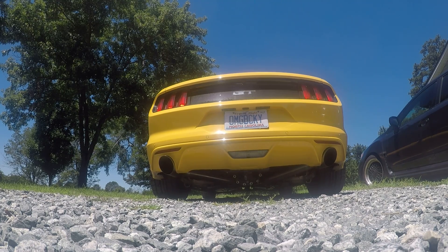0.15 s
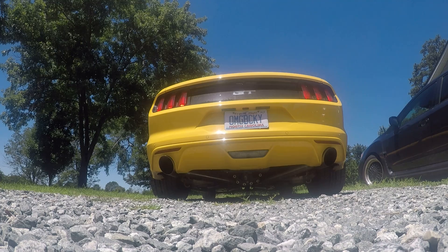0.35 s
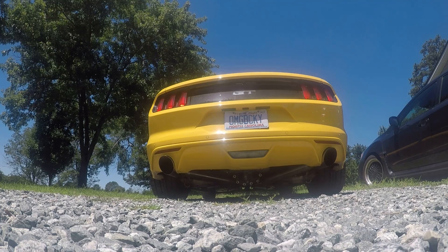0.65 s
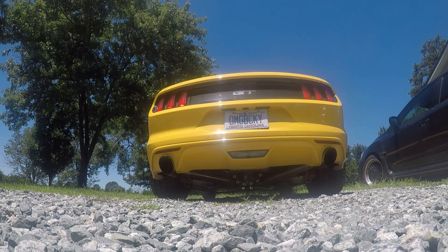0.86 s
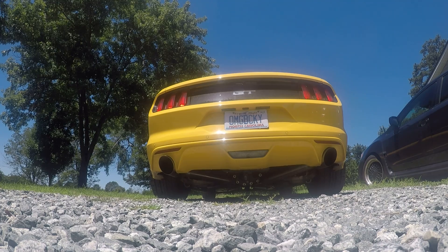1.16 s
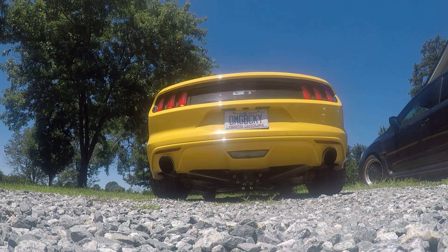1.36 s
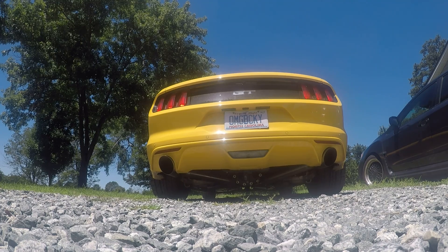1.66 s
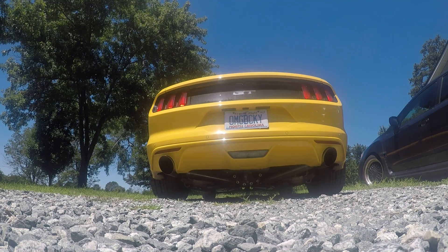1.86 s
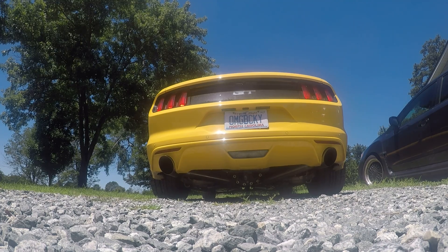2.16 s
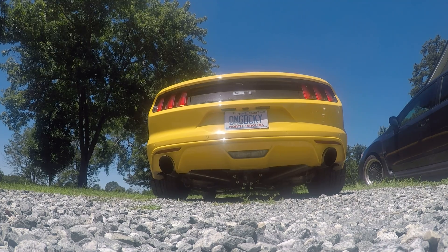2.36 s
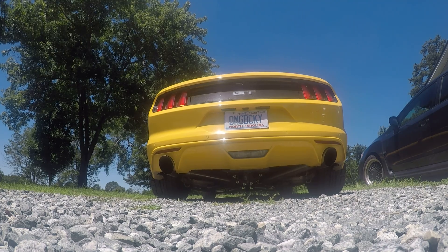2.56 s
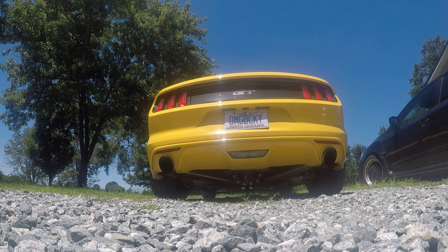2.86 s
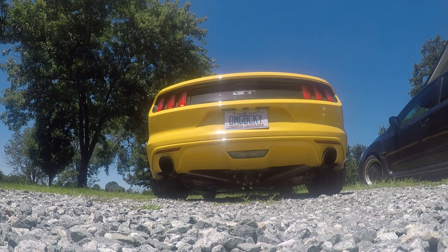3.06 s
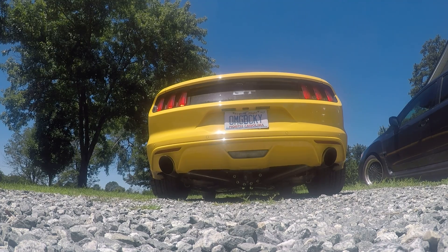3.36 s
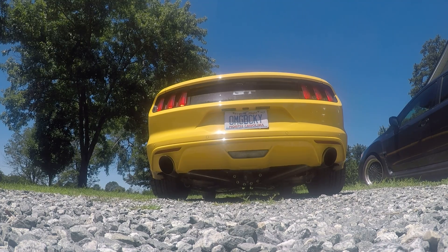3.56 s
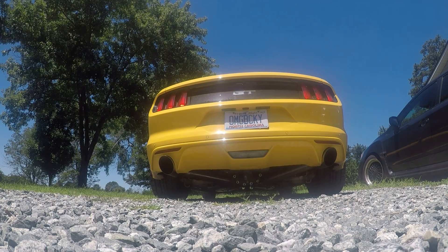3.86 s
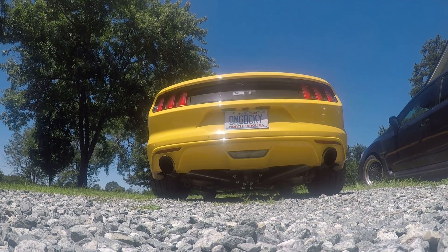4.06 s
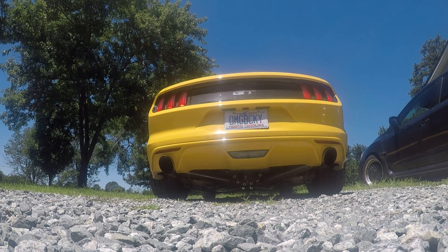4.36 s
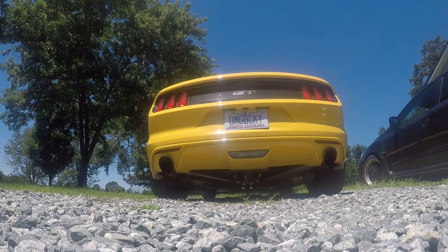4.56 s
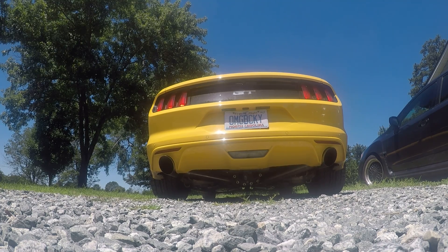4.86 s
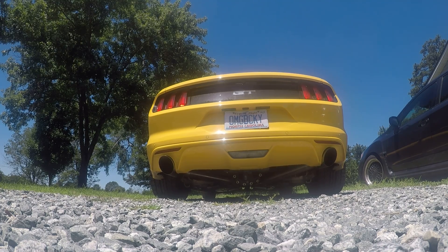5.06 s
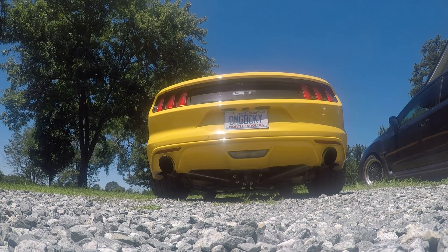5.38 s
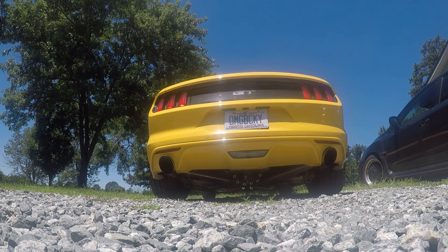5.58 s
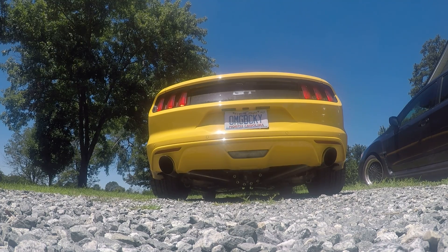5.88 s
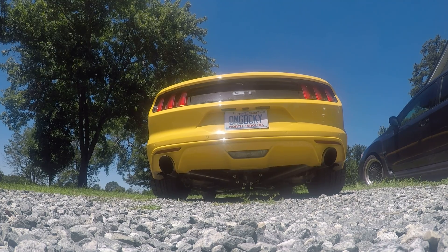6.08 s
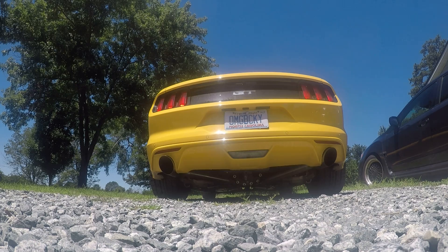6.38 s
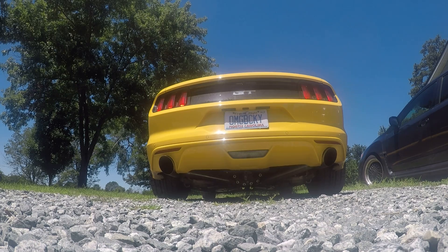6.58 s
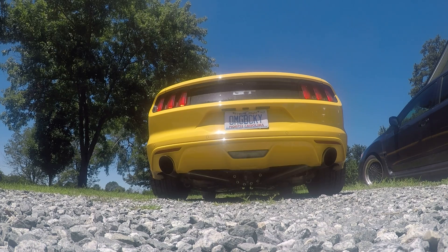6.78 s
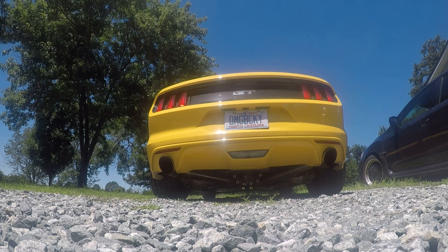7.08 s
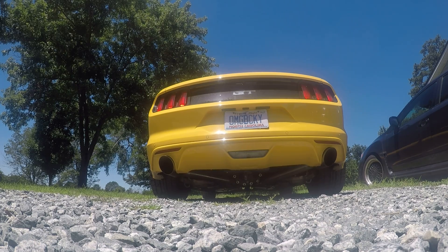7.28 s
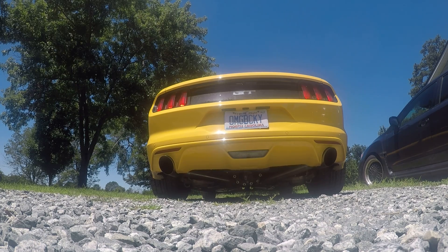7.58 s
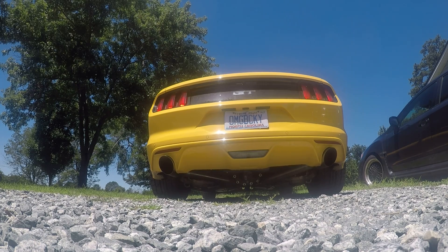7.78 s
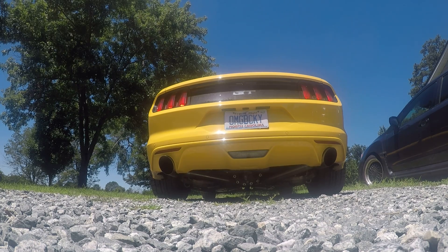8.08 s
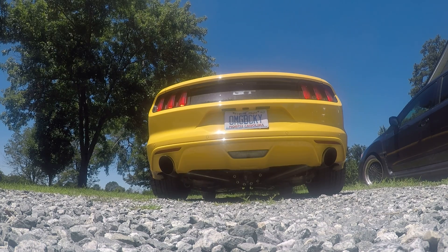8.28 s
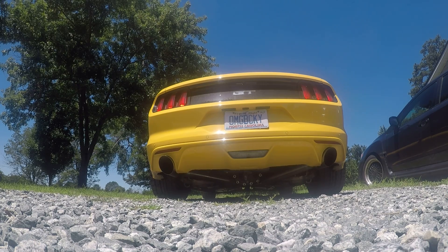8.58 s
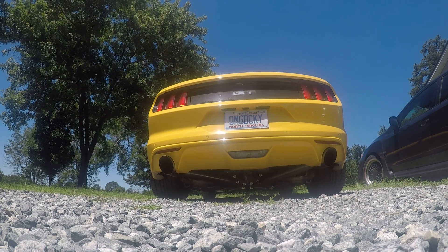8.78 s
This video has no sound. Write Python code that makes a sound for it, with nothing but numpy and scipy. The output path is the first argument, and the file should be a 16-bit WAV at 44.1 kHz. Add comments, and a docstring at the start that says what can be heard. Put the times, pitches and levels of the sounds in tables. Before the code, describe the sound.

Loud, dry exhaust idle of a big eight-cylinder engine, outdoors, with the microphones near the ground behind the tailpipes. A fast, uneven cold idle with raspy crackle swells slightly for a second, slides down a little in speed by about 1.7 seconds, and becomes a deep, denser throb. Bassy pulses, pipe rasp and small bursts of hiss continue steadily, over barely audible wind rumble.

```python
"""A V8 idles through two open tailpipes, heard from behind: after a second its fast cold idle sinks and settles.
Each engine cycle repeats an uneven lope of thumps, pressure waves that ring and reflect inside the pipes.
Each wave front cracks as it leaves the pipe and trails a puff of jet hiss, noise opened by the gas flow.
Rough flow rasps inside the pipes, and faint low wind flutters behind; all reach two microphone ports."""
import sys
import numpy as np
from scipy import signal
from scipy.fft import rfft, irfft, next_fast_len
from scipy.io import wavfile

SR = 44100
rng = np.random.default_rng(int(sys.argv[2]) if len(sys.argv) > 2 else 0)


def to_wav(sig):
    """Store sig (one row per channel, or 1-D mono) as 16-bit WAV at the path in sys.argv[1].

    Samples outside -1..1 are clipped; the rate is SR.
    """
    pcm = np.clip(np.atleast_2d(sig), -1, 1) * 32767
    pcm = np.round(pcm).astype(np.int16)
    wavfile.write(sys.argv[1], SR, pcm.T)  # frames by channels


N = 393813

# Source levels over time, before each source's own offset: t/s, thump level/dB, crack level/dB, wind level/dB
SOURCE_LEVELS = [(0.0, -17, -27, -54), (1.1, -16.5, -27, -55), (1.3, -16, -27.5, -52),
                 (1.45, -16, -30.5, -59), (1.7, -14.5, -30.5, -59), (2.0, -13, -31.5, -43),
                 (2.7, -11.5, -31, -66), (4.5, -11, -32, -44), (8.93, -11, -34, -49)]
# Transition of the cam timing as the speed sinks: t/s, share of the settled idle/1
IDLE_SETTLING = [(1.05, 0.02), (1.4, .4), (1.7, 0.98)]


def gain_of(db):
    """Level to amplitude: 20 dB is a factor of ten in pressure."""
    return 10 ** (np.asarray(db) / 20)


def evened(x):
    """Normalization to unit RMS, so that a level alone sets the loudness."""
    return x / np.sqrt(np.mean(x ** 2) + 1e-20)


def read(points, hz):
    """Interpolation of a spectrum on a logarithmic frequency axis."""
    f, value = np.transpose(points)
    return np.interp(np.log(hz + 1), np.log(f + 1), value)


def curve(rows, column=1):
    """Linear interpolation of one table column at every sample."""
    return np.interp(np.arange(N) / SR, [r[0] for r in rows], [r[column] for r in rows])


def filtered(x, response):
    """Linear filtering: the spectrum is multiplied by a function of frequency."""
    size = next_fast_len(N)
    spectrum = rfft(x, size) * response(np.fft.rfftfreq(size, 1 / SR))
    return irfft(spectrum, size)[..., :N]


def causal(points, size=8192):
    """Minimum phase: folding the cepstrum gives the earliest impulse response with this spectrum."""
    log_gain = read(points, np.fft.rfftfreq(size, 1 / SR)) * np.log(10) / 20
    cepstrum = irfft(log_gain)
    cepstrum[1:size // 2] *= 2
    cepstrum[size // 2 + 1:] = 0
    return irfft(np.exp(rfft(cepstrum)))[:size // 2]


def settled_share():
    """Crossfade weight of the settled idle, from 0 to 1."""
    return np.clip(curve(IDLE_SETTLING), 0, 1)


def blended(fast, settled):
    """Linear crossfade from the fast idle to the settled idle at equal RMS."""
    share = settled_share()
    return (1 - share) * evened(fast) + share * evened(settled)


def wind():
    """Low-frequency turbulence: band-limited noise, mostly coherent between the ports, raised by gusts."""
    # Gusts as Gaussian rises: t/s, rise of the wind level/dB, length/s
    gust_rows = [(.17, 11, 0.13), (.42, 7, .07), (1.02, 18, 0.12)]
    air = rng.standard_normal((N, 2)).T
    partly_shared = air + 2.2 * air[0]

    def flutter_band(hz):
        """Second-order rise about 14 Hz and steep fall above 55 Hz."""
        return (hz / 14) ** 2 / (1 + (hz / 14) ** 2) / (1 + (hz / 55) ** 6)

    low = filtered(partly_shared, flutter_band)
    t = np.arange(N) / SR
    gusts_db = sum(db * np.exp(-((t - s) / length) ** 2) for s, db, length in gust_rows)
    return gain_of(curve(SOURCE_LEVELS, column=3) + gusts_db) * evened(low)


def rasp(flow):
    """Turbulent pipe flow: noise modulated by the square root of the flow, so it throbs more gently."""
    # Spectrum of the rasp: f/Hz, relative level/dB per Hz
    rasp_colour = [(40, -60), (90, -29), (300, 4.5), (520, -1.5), (760, 2), (1100, -9), (1450, -5.5),
                   (1800, -46), (3000, -50)]
    noise = rng.standard_normal((N, 2)).T
    throbbing = flow ** .5 * (noise + 1.4 * noise[0])
    coloured = filtered(throbbing, lambda hz: gain_of(read(rasp_colour, hz)))
    return gain_of(curve(SOURCE_LEVELS, column=1) - 15.5) * evened(coloured)


def waves(column):
    """Energy normalization: places and levels of all waves, each idle's cycle scaled to the same energy."""
    # One row per cylinder, fast idle, then settled idle:
    # its blow, then a second, mostly weaker wave close to it, usually after it.
    # Columns: blow place/firings (cycle of 8), thump level/dB, crack level/dB,
    # second place/firings, thump level/dB, crack level/dB; levels before the energy scaling
    cylinder_rows = [
        [(-0.01, -4.9, -20.0, 0.12, -18.9, -19.0), (1.08, -1.6, -13.0, 1.3, -18.5, -21.0),
         (2.01, -13.4, -16.0, 2.26, -29.5, -29.0), (2.93, -11.1, -21.0, 3.4, -17.9, -26.0),
         (3.99, -8.3, -19.0, 4.14, -13.5, -14.0), (4.96, -3.7, -16.0, 5.16, -12.1, -15.0),
         (6.03, -4.9, -11.0, 6.59, -15.6, -21.0), (7.02, -3.8, -12.0, 7.69, -11.5, -26.0)],
        [(0.12, -5.3, -27.0, 0.32, -10.1, -33.0), (1.09, -1.1, -26.0, 1.32, -6.7, -27.0),
         (2.02, -5.9, -22.0, 2.44, -8.9, -27.0), (3.02, -1.0, -21.0, 3.4, -4.4, -30.0),
         (4.08, 0.0, -24.0, 4.4, -5.5, -31.0), (5.01, -0.1, -20.0, 5.3, -14.4, -30.0),
         (6.06, -0.9, -17.0, 6.2, -12.6, -23.0), (7.05, -1.9, -22.0, 6.84, -18.3, -29.0)],
    ]
    by_wave = np.reshape(cylinder_rows, (2, 8, 2, 3))  # idle, cylinder, wave, column
    place, db = by_wave[..., [0, column]].transpose(3, 0, 1, 2)
    energy = (gain_of(db) ** 2).sum(axis=(1, 2), keepdims=True)
    return place, db - 10 * np.log10(energy)


def cycle_train(place, db, spread_db, jitter_ms):
    """Periodic excitation: a click per wave per cycle, gliding between idles; no two cycles burn quite alike."""
    # The fast idle swells, sinks, then hunts gently: t/s, firing rate f/Hz
    firing_rate = [(0.0, 94.42), (0.6, 97.59), (0.81, 97.31), (1.4, 86.23), (1.68, 83.42), (1.92, 83.66),
                   (2.65, 82.62), (2.95, 83.6), (4.12, 82.36), (4.4, 83.05), (5.02, 82.1), (5.69, 82.59),
                   (7.53, 81.75), (7.73, 82.96), (8.26, 82.88), (8.93, 84.14)]
    firings = np.cumsum(curve(firing_rate)) / SR
    cycle = 8 * np.arange(-1, firings[-1] // 8 + 1)[:, None]
    share = np.interp(place[0] + cycle, firings, settled_share())
    at = place[0] + share * (place[1] - place[0]) + cycle
    db = db[0] + share * (db[1] - db[0])

    # The blows of a bank even out, by a share of 0.69 halfway through the settling
    blows = db[:, ::2]
    evening = 0.69 * np.sin(np.pi * share[:, ::2])
    db[:, ::2] = blows + evening * (blows.mean(axis=1, keepdims=True) - blows)

    size, late = rng.standard_normal((*at.shape, 2)).transpose(2, 0, 1)
    sample = np.interp(at, firings, np.arange(N), -SR, N) + late * jitter_ms * SR / 1000
    inside = (sample >= 0) & (sample < N - SR // 1000)
    heights = gain_of(db + spread_db * size)
    return np.bincount(sample[inside].astype(int), heights[inside], N)


def echoed(x, echoes):
    """Superposition of the direct wave and its delayed reflections."""
    taps = np.zeros(SR // 20)
    taps[0] = 1
    for ms, share in echoes:
        taps[round(ms * SR / 1000)] += share
    return signal.oaconvolve(x, taps)[:N]


def pipes(column, late, spread_db, jitter_ms):
    """Superposition of two ducts: each bank of cylinders blows down its own reflecting pipe."""
    # Pipe number for each cylinder in firing order
    pipe_of_firing = np.array([0, 1, 0, 0, 1, 0, 1, 1])
    # Reflections, one list per pipe: delay/ms, share of the direct wave/1 (negative where the wave turns over)
    pipe_echoes = [
        [(4.74, -0.19), (6.45, 0.19), (10.39, 0.26), (12.3, -0.21), (21.88, -0.2), (36.07, 0.32)],
        [(3.9, -0.11), (7.17, -0.13), (9.47, 0.16), (20.42, -0.1), (21.58, -0.23), (26.34, 0.12)],
    ]
    place, db = waves(column)
    total = np.zeros(N)
    for bank, echoes in enumerate(pipe_echoes):
        ours = pipe_of_firing == bank
        bank_place = place[:, ours].reshape(2, -1) + late
        bank_db = db[:, ours].reshape(2, -1)
        total += echoed(cycle_train(bank_place, bank_db, spread_db, jitter_ms), echoes)
    return total


def gas_flow():
    """Pulsed outflow: fronts as clicks, and how hard gas tears past the pipe ends, a spurt then a fading puff."""
    ms = np.arange(-200, 2000) * 1000 / SR
    spurt = np.exp(-(ms / 0.5) ** 2)
    puff = gain_of(-5.5) * np.exp(-abs(ms) / 3.3) * (ms > 0)
    fronts = pipes(2, late=.03, spread_db=1.76, jitter_ms=.12)  # cracks trail their waves by .03 firings
    power = signal.oaconvolve(fronts ** 2, spurt ** 2 + puff ** 2)[200:N + 200]
    steady = gain_of(-22.)  # keeps some flow between the puffs
    flow = np.sqrt(abs(power) / power.mean() + steady)
    return evened(fronts), evened(flow)


def cracks(fronts, flow):
    """Shock and jet noise: a snap at each front, hiss opened by the flow, with partial coherence at the ports."""
    # Colours of cracks and hiss, fast idle, then settled idle: f/Hz, relative level/dB per Hz
    crack_colours = [
        [(400, -13), (800, 4), (1400, -5), (1850, -18), (2820, -6), (3350, -1), (3980, -2.5), (5310, -11),
         (6400, 0), (7890, -11), (9440, -12.5), (11400, -26.5), (13300, -29), (15500, -46)],
        [(400, -56), (800, 10), (1400, -19), (1850, -17), (2630, -4), (3380, -0.5), (3980, -1), (5030, -12),
         (6300, -3.5), (8180, -14.5), (9360, -16), (11300, -29.5), (13200, -35), (15500, -58)],
    ]
    # Coherence of the two ports: f/Hz, shared amplitude/1
    port_coherence = [(500, 0.61), (2000, 0.69), (4000, 0.98), (7000, 0.13), (12000, 0.76)]
    shared, own = rng.choice([-1., 1.], (N, 2)).T

    def same(hz):
        """Shared part of the sound at the second port."""
        return np.clip(read(port_coherence, hz), 0, 1)

    jet = filtered(flow * shared, lambda hz: 1 - 1 / (1 + (hz / 1300) ** 4))  # only the snaps reach down low
    left = jet - 0.91 * fronts
    right_own = filtered((flow + 0.83 * fronts) * own, lambda hz: np.sqrt(1 - same(hz) ** 2))
    right = filtered(left, same) + right_own
    ports = np.array([left, right])
    fast, settled = (filtered(ports, lambda hz: gain_of(read(colour, hz))) for colour in crack_colours)
    return gain_of(curve(SOURCE_LEVELS, column=2) + 2.5) * blended(fast, settled)


def thumps():
    """Duct resonance: waves ring the pipe, heard through a steep band from 66.5 Hz to 2 kHz."""
    # What one wave rings with: f/Hz, level/dB
    pipe_modes = [(20.0, -146.0), (58.0, 0.0), (80.0, -7.9), (120.0, -8.3), (200.0, -1.5), (280.0, -0.3),
                  (350.0, -4.3), (430.0, -13.6), (560.0, -17.9), (660.0, -23.4), (760.0, -21.0),
                  (900.0, -25.2), (1300.0, -33.0), (2200.0, -54.3)]
    clicks = pipes(1, late=0, spread_db=.5, jitter_ms=.05)
    rung = -signal.oaconvolve(clicks, causal(pipe_modes))[:N]

    def thump_band(hz):
        """Steep cutoff below 66.5 Hz and steep fall above 2 kHz."""
        return (1 - 1 / (1 + (hz / 66.5) ** 24)) / (1 + (hz / 2000) ** 8)

    boom = filtered(evened(rung), thump_band)
    return gain_of(curve(SOURCE_LEVELS, column=1)) * boom


def scene():
    """Superposition of all sources; one gas flow drives both the cracks and the rasp."""
    fronts, flow = gas_flow()
    return thumps() + cracks(fronts, flow) + rasp(flow) + wind()


def record(dry):
    """Two-port transduction: differing level and phase, soft saturation of the tallest peaks, a band limit."""
    # Level difference, first port over second: f/Hz, level/dB
    port_level = [(40, 2), (85, 2.5), (160, 1), (300, 0), (450, -1.5), (740, -5.5), (1200, -5), (2000, 0),
                  (3300, -1.5), (4400, 2), (5800, 9), (7500, -5), (9500, -8), (15000, -7)]
    # Phase difference, first port over second: f/Hz, phase/rad
    port_phase = [(60, -.22), (150, -.3), (400, -.33), (700, -.4), (1550, 1.5), (1980, 0.1), (5900, -.3),
                  (6550, .3), (7240, 3.9), (9200, 2.7), (12800, .1)]
    side = np.array([[.5], [-.5]])  # each port takes half of the difference

    def port_response(hz):
        """Complex gain of each port."""
        return gain_of(side * read(port_level, hz)) * np.exp(1j * side * read(port_phase, hz))

    ports = filtered(dry, port_response)
    ports = ports / (1 + abs(ports) ** 6) ** (1 / 6)
    band_limit = signal.firwin(511, 15700, window=("kaiser", 9), fs=SR)  # cutoff in Hz
    return signal.oaconvolve(ports, band_limit[None], "same")


dry = scene()
out = record(dry)
to_wav(out)
```